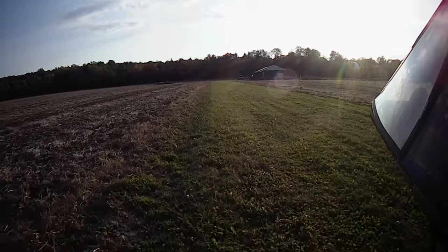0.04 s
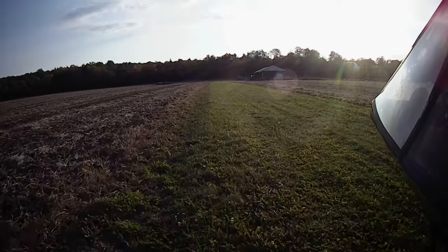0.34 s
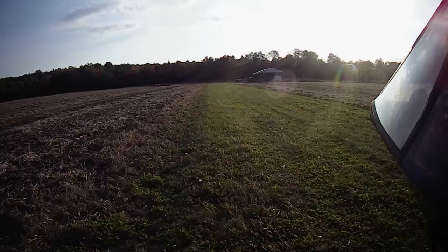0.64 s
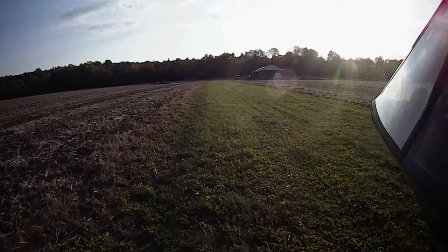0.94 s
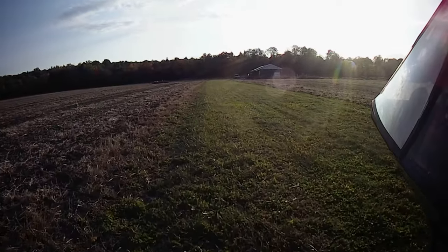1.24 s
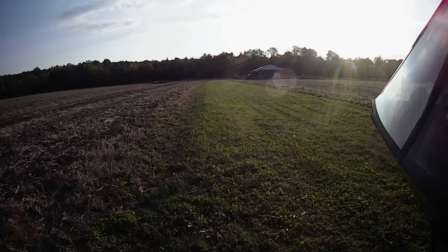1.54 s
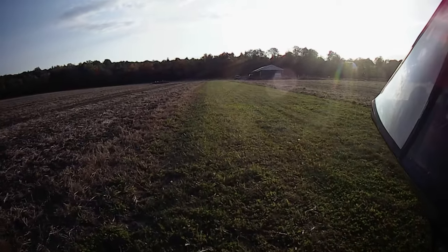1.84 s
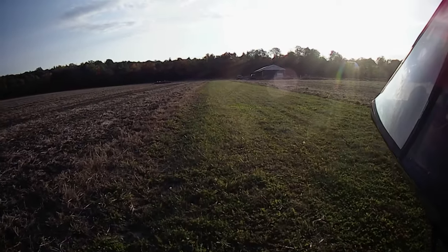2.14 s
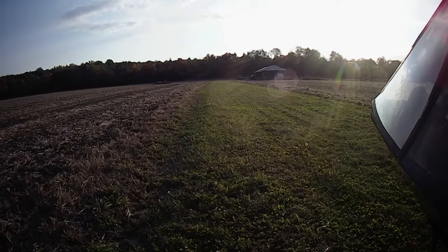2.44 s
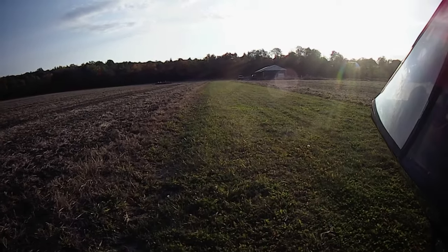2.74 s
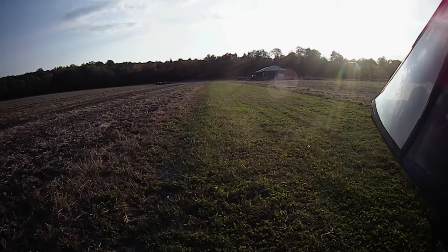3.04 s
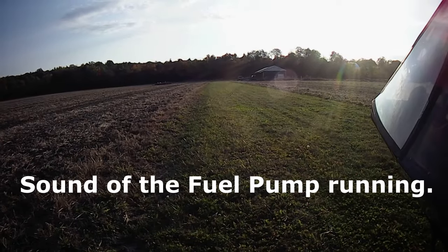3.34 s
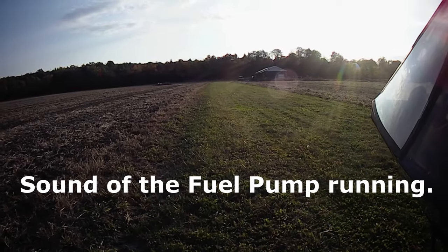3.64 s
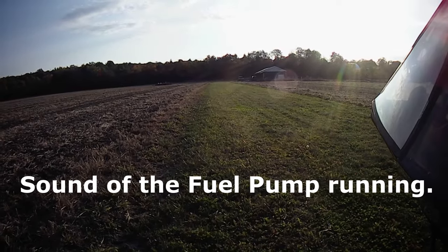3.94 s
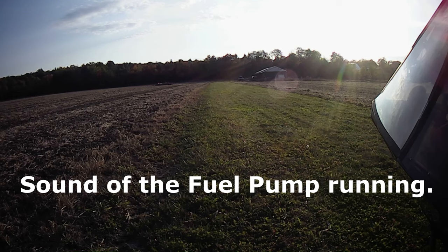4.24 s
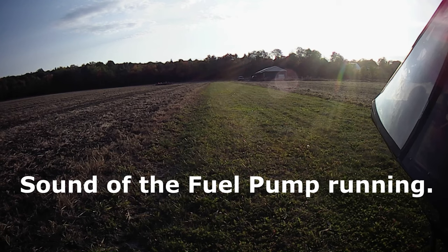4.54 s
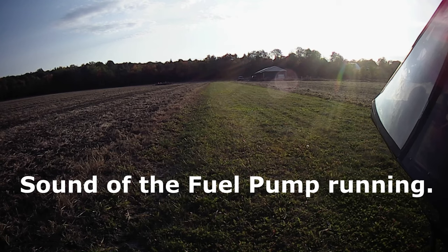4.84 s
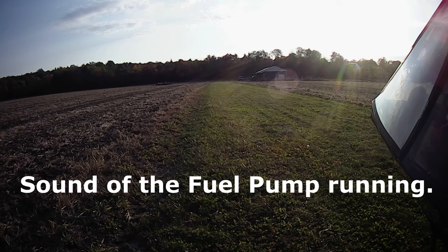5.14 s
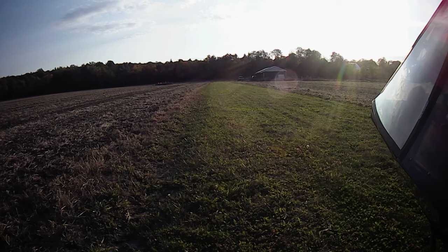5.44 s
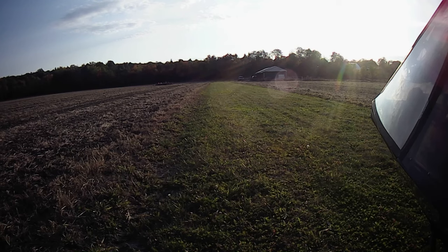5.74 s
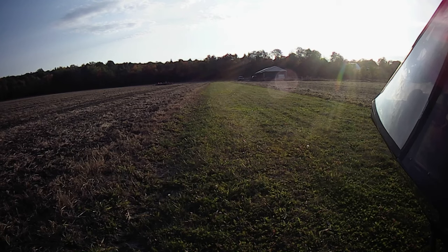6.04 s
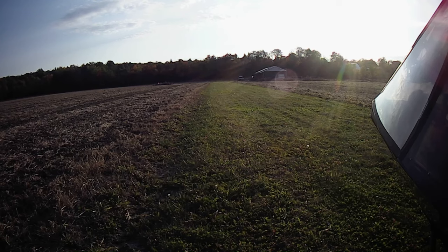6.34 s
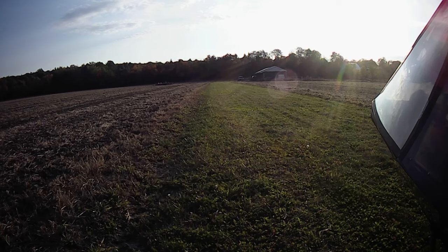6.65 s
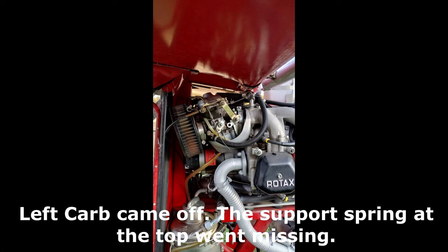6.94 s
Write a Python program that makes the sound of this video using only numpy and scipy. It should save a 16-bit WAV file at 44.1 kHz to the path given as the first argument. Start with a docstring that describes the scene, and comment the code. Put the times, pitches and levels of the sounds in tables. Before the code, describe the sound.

A small aircraft rumbles and rattles to a stop on grass while its fuel pump ticks rapidly, until a switch snaps it off.

```python
"""A light aircraft, engine off, rolls on a grass strip: the airframe rumbles, thumps, rattles and creaks.
From the start the electric fuel pump ticks 15 times a second, each plunger stroke ringing the fuselage.
The aircraft stops by about 4 s; at 5.5 s a switch snaps the pump off. Soft bumps and scuffs follow,
then at 6.6 s the hollower clack of a lever. A camera on the airframe hears it all over its own hiss."""
import sys
import numpy as np
from scipy import signal
from scipy.fft import rfft, irfft, next_fast_len
from scipy.io import wavfile
from scipy.ndimage import map_coordinates

SR = 44100
rng = np.random.default_rng(int(sys.argv[2]) if len(sys.argv) > 2 else 0)


def store_pcm(level_fs):
    """Save levels as 16-bit WAV."""
    pcm = np.round(np.clip(level_fs, -1, 1) * 32767).astype(np.int16)
    wavfile.write(sys.argv[1], SR, np.atleast_2d(pcm).T)


N = 308700


def amp(db):
    """Decibels to gain."""
    return 10 ** (np.asarray(db) / 20)


def unit(x):
    """Scale to rms 1."""
    return x / np.sqrt(np.mean(x ** 2) + 1e-20)


def add(track, s, sound):
    """Mix a sound into a track at s seconds."""
    start = max(round(s * SR), 0)
    track[start:start + len(sound)] += sound[:N - start]


def along(points, s):
    """Interpolate (time [s], value) points at s."""
    return np.interp(s, *np.transpose(points))


def wobble(knots_per_s):
    """Smooth random curve."""
    knots = rng.standard_normal(int(N * knots_per_s / SR) + 4)
    return map_coordinates(knots, [np.arange(N) * knots_per_s / SR])


def colour(x, spectrum):
    """Minimum-phase filter of unit energy through (frequency [Hz], level [dB]) points."""
    size = 4096
    hz, db = np.transpose(spectrum)
    bins_hz = np.fft.rfftfreq(size, 1 / SR)
    gain = amp(np.interp(np.log(bins_hz + 1), np.log(hz), db))
    cepstrum = irfft(np.log(np.maximum(gain, 1e-6)))
    cepstrum[1:size // 2] *= 2
    cepstrum[size // 2 + 1:] = 0
    response = irfft(np.exp(rfft(cepstrum)))
    return signal.fftconvolve(x, response / np.linalg.norm(response))[:len(x)]


def noise(spectrum):
    """Coloured noise, rms 1."""
    return unit(colour(rng.standard_normal(N), spectrum))


def ring(modes, scatter_db, detune, length_s=0.4):
    """One blow: each mode swells as the wave spreads through the structure, then decays."""
    t = np.arange(int(length_s * SR)) / SR
    hz, db, t60_s, swell_s = np.transpose(modes)[:, :, None]
    level_draw, pitch_draw = rng.standard_normal((2, len(modes), 1))
    decay = amp(db + scatter_db * level_draw - 60 * t / t60_s)
    attack = 1 - np.exp(-(t / swell_s) ** 2)
    partials = np.sin(2 * np.pi * hz * (1 + detune * pitch_draw) * t)
    return np.sum(attack * decay * partials, axis=0)


def burst(t60_s):
    """Decaying noise: a short crash of tiny contacts."""
    t = np.arange(SR // 8) / SR
    return amp(-60 * t / max(t60_s, 0.004)) * rng.standard_normal(len(t))


# Shaking by the turf: (time [s], level [dB])
SHAKE = [(0.0, -43), (0.35, -40), (0.82, -48), (1.44, -51.5), (2.25, -57.5), (2.46, -53), (2.85, -64.5),
         (3.26, -73), (3.7, -74), (4.2, -97)]
# Light breeze, also at rest: (rumble [dB], drone [dB], chatter [dB])
BREEZE = [-64.5, -61, -67.5]
# Airframe rocking: (time [s], half length [s], rumble [dB], drone [dB], chatter [dB])
SHUDDERS = [(0.413, 0.26, -43, -41.5, -46.5), (1.3, 0.47, -46, -44, -48.5), (1.897, 0.048, -45, -36.5, -47),
            (2.414, 0.074, -74, -48, -54), (3.077, 0.13, -59, -43.5, -49), (3.386, 0.039, -48, -53, -59),
            (3.811, .08, -59, -61, -58), (6.3, 0.16, -62.5, -57, -63.5), (6.59, 0.12, -50.5, -49.5, -62),
            (6.712, .07, -48.5, -57, -71)]
# Wheel rumble: (frequency [Hz], density [dB])
RUMBLE = [(12, -41), (20, -9.5), (48, -5.5), (70, -1.5), (124, -2), (156, -19), (189, -4.5), (220, 1),
          (290, -53), (480, -120)]
# Airframe drone: (frequency [Hz], density [dB])
DRONE = [(88, -47), (150, -8), (162, -7), (181, -27), (194, 1), (253, -15.5), (289, 3.5), (313, 2.5),
         (336, 3.5), (482, -13), (548, -11), (700, -25), (910, -78), (1540, -120)]


def rolling():
    """Wheels rumble, the airframe drones and chatters; turf, breeze and shudders add in power."""
    t = np.arange(N) / SR
    shake_db = along(SHAKE, t) + 41.5
    turf_db = [-39 + shake_db, -37 + 0.85 * shake_db, -43.5 + 0.91 * shake_db]
    power = amp(turf_db) ** 2 + amp(BREEZE)[:, None] ** 2
    for s, half_s, *levels_db in SHUDDERS:
        power += amp(levels_db)[:, None] ** 2 * np.exp(-2 * ((t - s) / half_s) ** 2)
    rumble_db, drone_db, chatter_db = 10 * np.log10(power)
    rumble = amp(rumble_db) * noise(RUMBLE)
    lurch_db = 2.5 * wobble(knots_per_s=55)
    drone = amp(drone_db) * unit(amp(lurch_db) * noise(DRONE))
    return rumble + drone + skin_chatter(chatter_db)


# Airframe skin: (frequency [Hz], density [dB])
SKIN = [(60, -32), (300, -19), (450, -6.5), (690, 0), (830, 4.5), (990, -0.5), (1130, 3), (1550, 2),
        (1950, -7), (2150, -4.5), (2480, -14.5), (2750, -23), (4200, -33), (7000, -48.5)]
# Struck cabin panels: (frequency [Hz], density [dB])
PANELS = [(60, -50), (300, -21.5), (500, 3.5), (690, -7), (760, -1.5), (910, 7.5), (990, -6.5), (1130, 2.5),
          (1700, 2.5), (1950, -4.5), (2150, 2.5), (2480, -9), (2750, -23.5), (7000, -63)]
# Bright edge of a contact: (frequency [Hz], density [dB])
EDGE = [(200, -63), (1500, -9), (2750, -5), (3250, 4.5), (3600, -4), (4200, -1), (4900, -18.5),
        (7000, -16.5), (11000, -55.5)]


def skin_chatter(level_db):
    """The skin murmurs at rest; hard shaking clumps the chatter and unseats small parts, which click."""
    clump_depth_db = np.interp(level_db, [-62, -45], [0.8, 3.2])
    chatter = amp(level_db + clump_depth_db * wobble(knots_per_s=90)) * noise(SKIN)
    clicks_per_s = np.interp(level_db, [-52, -42], [0, 110])
    taps = amp(level_db) * rng.uniform(-0.72, 1, N) * (rng.random(N) < clicks_per_s / SR)
    clicks = amp(20.5) * colour(taps, PANELS) + amp(1.5) * colour(taps, EDGE)
    return chatter + clicks


# Camera self-noise: (frequency [Hz], density [dB])
HISS = [(1470, -39.5), (2500, -3), (2790, -5), (3080, -6), (3260, 1), (3510, -5), (3700, -5.5), (9680, -7),
        (12600, -8), (16400, -27.5), (22000, -120)]


def camera_hiss(whine_hz=6055):
    """Even hiss and a faint electronic whine."""
    whine = amp(-87.5) * np.sin(2 * np.pi * whine_hz * np.arange(N) / SR)
    return amp(-67.5) * noise(HISS) + whine


# Surge depth: (time [s], loss per stroke [dB])
SAG = [(0, 0), (2.5, 0.96), (3.9, 1.36), (4.15, 2), (4.5, 0.5), (4.85, 4), (5.1, 3), (5.35, -0.8)]


def pump_strokes():
    """(time [s], level [dB]) per stroke. Each surge: a full stroke, then shorter as pressure builds."""
    first_s, period_s, slowing_s, off_s = 0.0189, 0.066545, 5.5e-6, 5.51
    strokes_per_surge, scatter_db = 3.27, 0.5
    weak_stroke_s, weak_db = 2.817, -9.5  # the plunger barely moves, once
    k = np.arange(int(off_s / period_s) + 1)
    s = first_s + period_s * k + slowing_s * k ** 2 / 2
    s[-1] += 0.004  # drags as the switch opens
    since_surge = np.floor((k - 0.39) % strokes_per_surge)
    db = -0.52 - along(SAG, s) * since_surge + scatter_db * rng.standard_normal(len(k))
    db += weak_db * (abs(s - weak_stroke_s) < period_s / 2)
    return zip(s, db)


# Fuselage modes: (frequency [Hz], level [dB], t60 [s], swell [s])
FUSELAGE_MODES = [(135.5, -48, 0.084, 0.0044), (238.6, -41.5, 0.28, 0.029), (333.5, -41, 0.15, 0.0086),
                  (443, -55.5, 0.3, 0.0018), (536.2, -49.0, 0.3, 0.004), (634.5, -44.5, 0.07, 0.00081),
                  (767.6, -39.5, 0.34, 0.0056), (813, -38.5, 0.061, 0.018), (896, -56.5, 0.29, 0.004),
                  (1137.5, -41.5, 0.14, 0.0058), (1258, -25.5, 0.043, 0.011),
                  (1388.3, -28.5, 0.053, 0.0071), (1439, -32.0, 0.044, 0.0017), (1466, -49.5, 0.16, 0.022),
                  (1574, -46, 0.069, 0.00098), (1653, -38, 0.038, 0.0027), (1811, -42, 0.073, 0.0057),
                  (1910, -56.5, 0.129, 0.0082), (2096, -51, 0.18, 0.003), (2172, -48, 0.084, 0.00065),
                  (2365, -47, 0.037, 0.0011), (2444, -43.5, 0.11, 0.014), (2510, -63.5, 0.27, 0.0059),
                  (3085, -58, 0.065, 0.0032), (1125, -41.5, 0.12, 0.0076), (2468, -54.5, 0.075, 0.004)]
# Damping by the returning plunger: (time after stroke [s], gain [dB])
DAMPING = [(.027, 0), (.035, -10), (.1, -9)]
# Return knock: (frequency [Hz], level [dB], t60 [s], swell [s])
RETURN_MODES = [(243.1, -41, 0.21, 0.0017), (324.4, -38.5, 0.071, 0.0029), (113, -51, .12, 0.0094),
                (746, -49, 0.062, 0.01), (1180, -53, 0.05, 0.0045), (1700, -58, 0.042, 0.0057),
                (2047, -67, 0.39, 0.0026)]


def fuel_pump():
    """Each stroke rings the fuselage; the return damps it with a low knock and a check-valve tick."""
    ticks, clatter = np.zeros(N), np.zeros(N)
    for s, db in pump_strokes():
        tick = ring(FUSELAGE_MODES, scatter_db=1.5, detune=0.002, length_s=0.25)
        damping_db = along(DAMPING, np.arange(len(tick)) / SR)
        add(ticks, s, amp(db + damping_db) * tick)
        return_db = 2.8 * db + 1  # only a full stroke loads the spring for a heavy return
        add(ticks, s + 0.029, amp(return_db) * ring(RETURN_MODES, scatter_db=2.2, detune=0.01))
        add(clatter, s + 0.002944, amp(db) * burst(t60_s=0.076))
        valve_db = db - 13.5 + 2.5 * rng.standard_normal()
        add(clatter, s + 0.038, amp(valve_db) * burst(t60_s=0.15))
    return amp(-0.5) * ticks + amp(-45.5) * colour(clatter, PANELS) + amp(-66) * colour(clatter, EDGE)


# Loose fittings: (time [s], level [dB], relative edge level [dB], t60 [s])
FITTINGS = [(0.0443, -34.5, -22, 0.06), (0.0742, -27, -28, 0.017), (0.1114, -28.5, -23, .028),
            (0.1823, -28.5, -20.5, 0.046), (0.281, -29.5, -22, 0.04), (0.3005, -26, -28, 0.087),
            (0.3459, -28.5, -21.5, 0.1), (0.513, -34.5, -21, 0.045), (0.597, -25, -29, 0.076),
            (0.628, -33.5, -21.5, 0.14), (0.7577, -29.5, -31, 0.024), (0.802, -26.5, -23, 0.028),
            (0.8639, -34.5, -20, 0.14), (0.8874, -35, -31, .027), (1.1192, -30, -40, 0.012),
            (1.5977, -30.5, -29, 0.042), (1.886, -31.5, -38, 0.016), (1.9664, -39.5, -21, .032),
            (2.139, -26.5, -23, 0.031), (2.4716, -27.5, -22, 0.038)]


def rattles(contacts):
    """Fittings strike the panels, each with its own amount of bright edge."""
    body, edge = np.zeros(N), np.zeros(N)
    for s, db, edge_db, t60_s in contacts:
        add(body, s - 0.002, amp(db) * burst(t60_s))
        add(edge, s - 0.002, amp(db + edge_db) * burst(t60_s))
    return colour(body, PANELS) + amp(3) * colour(edge, EDGE)


# Jolts: (time [s], level [dB])
JOLTS = [(0.265, -26), (0.307, -14.5), (0.329, -17), (0.382, -27), (0.603, -13), (0.667, -19.5),
         (0.752, -25), (0.799, -28), (0.948, -37), (1.007, -25), (1.294, -26.5), (1.5, -24.5), (1.87, -27),
         (2.139, -28.5), (2.53, -29.5), (2.998, -31.5), (3.356, -32), (5.729, -35.5), (6.001, -42.5),
         (6.067, -41), (6.512, -31)]
# Dull airframe modes: (frequency [Hz], level [dB], t60 [s], swell [s])
THUD_MODES = [(321.4, 6, 0.059, 0.0056), (301.6, -5.5, 0.065, 0.026), (366.4, 2, 0.034, 0.0046),
              (206, -27.5, 0.27, 0.0044)]


def bumps(tufts_per_s=5, tufts_end_s=2.6):
    """Jolts thud through the airframe; grass tufts add lesser ones during the roll."""
    track = np.zeros(N)
    count = int(tufts_end_s * tufts_per_s)
    tufts_s = (np.arange(count) + rng.random(count)) / tufts_per_s
    tufts_db = along(SHAKE, tufts_s) + 5.5
    for s, db in [*JOLTS, *zip(tufts_s, tufts_db)]:
        add(track, s - 0.004, amp(db) * ring(THUD_MODES, scatter_db=1, detune=0.015))
    return track


# Joint creaks: (time [s], length [s], level [dB], pitch [ratio])
CREAKS = [(1.121, .004, -6, 1.14), (1.474, .035, -5.5, 0.95), (1.72, .013, -8, 0.9), (1.8447, .004, -7, 1),
          (1.884, .03, -6.5, 1.0)]
# Joint modes: (frequency [Hz], level [dB], t60 [s], swell [s])
JOINT_MODES = [(1260, -25, 0.018, 0.0015), (1403, -19.5, 0.022, 0.0017), (1576, -20, 0.047, 0.002),
               (2080, -50, 0.032, 0.0029), (3150, -55, .02, .002)]


def creaks(slip_gap_s=0.009, jitter_s=0.00127, fall_per_s=3.4):
    """A joint sticks and slips as the airframe flexes: uneven runs of scraping chirps, falling in pitch."""
    chirps, scrape = np.zeros(N), np.zeros(N)
    for s, length_s, db, pitch in CREAKS:
        for after_s in np.arange(0, length_s, slip_gap_s):
            slip_s = s + after_s + rng.normal(0, jitter_s)
            modes = np.multiply(JOINT_MODES, [pitch * (1 - fall_per_s * after_s), 1, 1, 1])
            add(chirps, slip_s, amp(db) * ring(modes, scatter_db=3, detune=0.03))
            add(scrape, slip_s, amp(db - 28.5) * burst(t60_s=0.045))
    return chirps + colour(scrape, SKIN)


# Snap, then settling: (time [s], level [dB], high-pass [Hz])
SNAPS = [(5.5091, -1.5, 100), (5.558, -19, 604)]
# Switch and panel modes: (frequency [Hz], level [dB], t60 [s], swell [s])
SWITCH_MODES = [(329, -7, 0.13, 0.011), (293.3, -22.5, 0.2, 0.0013), (217.3, -28, 0.25, 0.015),
                (122, -42, 0.24, 0.015), (528, -33, 0.055, 0.0025), (760, -43, 0.051, 0.00086),
                (1160, -34, 0.062, .001), (1225, -35, 0.06, 0.00071), (1467, -26.5, 0.075, 0.0013),
                (1524, -26, 0.046, 0.0011), (1625, -24.5, 0.036, 0.0013), (2160, -37.5, 0.074, .001),
                (2380, -36, 0.03, .001), (2930, -41, 0.046, 0.00097), (3240, -30.5, 0.016, 0.0012),
                (3410, -47, 0.033, .001), (4460, -49.5, 0.024, .001)]


def pump_switch():
    """The contacts crack and ring the panel; a light touch is too brief to move all of it, so lacks bass."""
    track = np.zeros(N)
    for s, db, cutoff_hz in SNAPS:
        highpass = signal.butter(2, cutoff_hz, "highpass", fs=SR, output="sos")
        snap = ring(SWITCH_MODES, scatter_db=1.5, detune=0.001)
        crack = colour(burst(t60_s=0.054), PANELS)
        add(track, s, amp(db) * signal.sosfilt(highpass, snap))
        add(track, s, amp(db - 31) * crack)
    return track


# Faint rubs: (time [s], level [dB], half length [s])
SCUFFS = [(5.879, -60.5, 0.013), (6.116, -58, 0.0065), (6.221, -56, 0.007), (6.805, -60.5, 0.0085)]


def scuffs():
    """Soft, brief rubs against the cabin lining."""
    t = np.arange(N) / SR
    envelope = sum(amp(db) * np.exp(-((t - s) / half_s) ** 2) for s, db, half_s in SCUFFS)
    return envelope * noise(PANELS)


# Lever modes: (frequency [Hz], level [dB], t60 [s], swell [s])
LEVER_MODES = [(86, -37.5, .65, 0.015), (126, -35, 0.5, 0.03), (210, -27.5, 0.21, .01),
               (284, -30.5, 0.22, 0.0057), (329, -26.5, 0.12, 0.0046), (442, -29, 0.14, 0.0029),
               (528, -26, 0.073, 0.006), (590, -36, 0.18, 0.0043), (695, -33.5, 0.1, 0.0039),
               (879, -14, 0.063, 0.008), (926, -30, 0.14, 0.011), (1110, -33, .08, 0.0035),
               (1297, -24.5, 0.06, 0.0035), (1590, -40, 0.035, 0.0059), (1797, -26, 0.048, 0.0036),
               (2160, -43, 0.14, 0.0056), (2760, -37.5, 0.045, 0.0041), (3160, -28, 0.036, 0.0049)]
# Catch contacts: (time [s], level [dB], relative edge level [dB], t60 [s])
CATCH = [(6.6498, -32, -19.5, 0.07), (6.6575, -26.5, -22, 0.032), (6.696, -52, -10, 0.038)]


def lever():
    """A lever scrapes home and clacks against its stop; its catch strikes."""
    track = np.zeros(N)
    clack = ring(LEVER_MODES, scatter_db=0, detune=0.0019)
    scrape = amp(-44) * colour(burst(t60_s=0.21), SKIN)
    add(track, 6.644, scrape)
    add(track, 6.648, clack)
    return track + rattles(CATCH)


def scene():
    """All sources at one microphone."""
    mix = rolling() + camera_hiss() + fuel_pump() + rattles(FITTINGS) + bumps() + creaks()
    mix += pump_switch() + scuffs() + lever()
    return mix[None]


def record(dry):
    """The camera thins the deepest bass and cuts everything above its band limit."""
    low_hz, top_hz = 36, 12800
    thinned = signal.sosfilt(signal.butter(3, low_hz, "highpass", fs=SR, output="sos"), dry)
    size = next_fast_len(N + SR // 2)
    passband = np.fft.rfftfreq(size, 1 / SR) < top_hz
    return irfft(rfft(thinned, size) * passband, size)[:, :N]


dry = scene()
out = record(dry)
store_pcm(out)
```